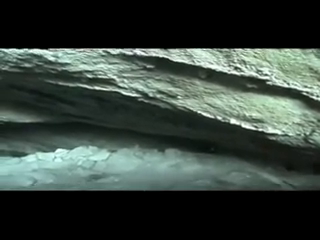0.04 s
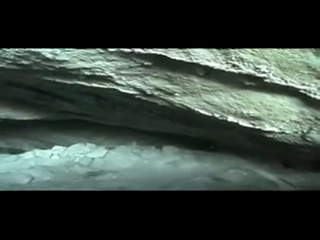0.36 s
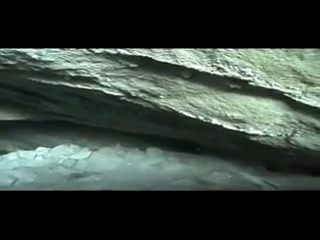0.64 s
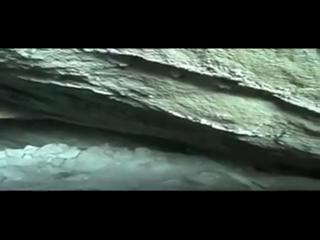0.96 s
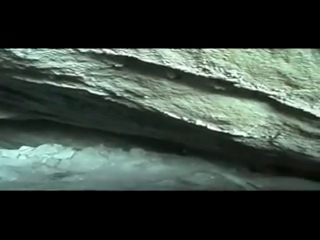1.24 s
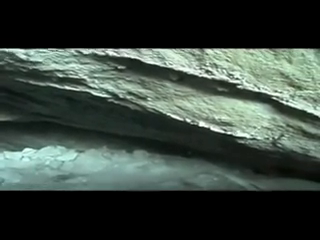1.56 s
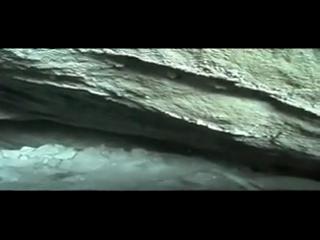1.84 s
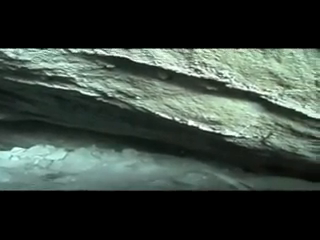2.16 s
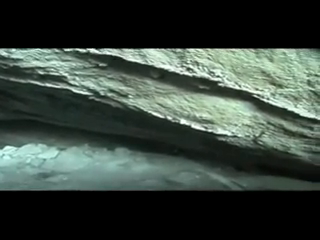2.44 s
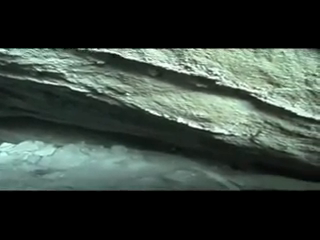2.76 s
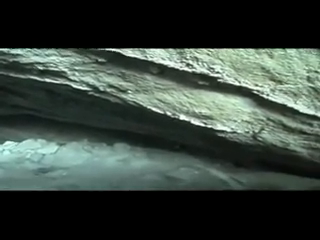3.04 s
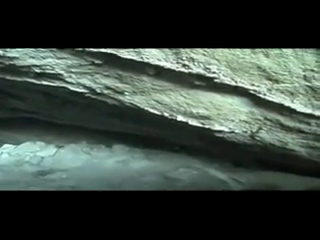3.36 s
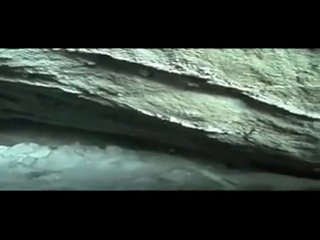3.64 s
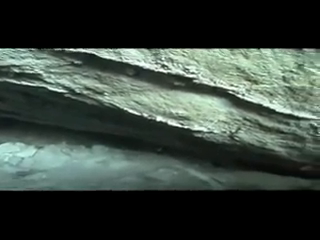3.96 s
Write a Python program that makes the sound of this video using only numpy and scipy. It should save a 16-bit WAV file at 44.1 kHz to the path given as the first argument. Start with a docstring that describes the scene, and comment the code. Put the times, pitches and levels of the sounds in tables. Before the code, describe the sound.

A few echoing water drops plop and tick beneath a rock overhang, above a deep rumble.

```python
"""Water drips into a pool under a rock overhang. Each drop slaps the surface, traps a bubble that
plops, and throws fine spray; other drops only tick on wet stone. The rock echoes after each one.
Underneath, a dull rumble rings the hollow's low resonances and gains bass toward the end,
while a deep drone slowly swells and sinks."""
import sys
import numpy as np
from scipy import signal
from scipy.fft import rfft, irfft
from scipy.io import wavfile

SR = 44100
rng = np.random.default_rng(int(sys.argv[2]) if len(sys.argv) > 2 else 0)


def bounce(signal):
    """Save signal as a 16-bit WAV file at the path given by the first command-line argument."""
    frames = np.transpose(np.atleast_2d(signal))
    limited = np.clip(frames, -1, 1)
    pcm = np.round(limited * 32767).astype(np.int16)
    wavfile.write(sys.argv[1], SR, pcm)


N = 176400

# rumble spectrum (frequency [Hz], relative density [dB])
RUMBLE_SPECTRUM = [(30, -15.5), (60, -7.5), (75, 2.5), (107, -11), (145, 1), (183, -6.5), (260, -6.5),
                   (319, -10.5), (423, -16), (519, -19), (800, -28), (1150, -34), (1500, -41.5),
                   (1900, -48), (2400, -70.5), (4000, -87), (10000, -104)]
# rumble width (frequency [Hz], side minus mid [dB])
RUMBLE_WIDTH = [(60, -5), (150, -3.5), (500, -3.5), (1000, -2.5), (2000, -2.5)]
# resonances of the hollow (frequency [Hz], width [Hz], level [dB])
HOLLOW_MODES = [(148.75, 23, -33.5), (213.9, 19, -36), (241.45, 10, -41), (317.3, 6.7, -40.5),
                (364.6, 1.6, -43), (400, 1.2, -48), (459.1, 19, -49), (517.7, 4.6, -48.5), (650, 31, -55.5),
                (818.4, 10, -56.5)]
# growing bass band (time [s], level [dB])
BASS_LEVELS = [(0, -43.5), (1.6, -47.5), (2.5, -37), (3.0, -36.5), (4.0, -25.5)]
# drone envelope (time [s], left gain [dB], right gain [dB])
DRONE_GAINS = [(0, -12.0, -13.0), (0.3, -15.0, -15.0), (0.58, -28.0, -15.0), (0.72, -25.0, -14.0),
               (0.95, -16.0, -12.0), (1.25, -13.0, -13.0), (1.55, -17.0, -22.0), (1.75, -16.0, -15.0),
               (2.05, -19.0, -12.0), (2.35, -19.0, -11.0), (2.6, -16.0, -10.0), (2.9, -20.0, -13.0),
               (3.15, -22.0, -16.0), (3.45, -21.0, -13.0), (3.7, -19.0, -10.0), (4.0, -22.0, -10.0)]
# drops and after-splashes on stone (time [s], rise [ms], level of rings 1-6 [dB])
STONE_HITS = [(0.6020, 2.6, -56, -65, -66, -55, -53, -64), (0.6120, 20.0, -69, -77, -79, -77, -76, -81),
              (2.6494, 1.7, -54, -66, -65, -60, -63, -69), (2.7142, 1.5, -68, -71, -65, -50, -48, -62),
              (3.5936, 1.3, -36, -39, -39, -32.5, -46, -42.5)]
# rings of a tick (frequency [Hz], width [Hz])
STONE_RINGS = [(2400, 2700), (5400, 450), (6150, 420), (7400, 1500), (8450, 1400), (9800, 840)]
# echo tail decay (frequency [Hz], T60 [s])
TAIL_T60 = [(500, 1.3), (1300, 1.1), (2800, 0.99), (7500, 0.74), (10000, 0.39)]
# echo tail spectrum (frequency [Hz], level re direct [dB])
TAIL_SPECTRUM = [(500, -12), (1300, -12.5), (2000, -9.5), (2450, -7.5), (2950, -9), (3400, -8), (4200, -4),
                 (7500, -6), (10000, -6.5)]
# returns from far faces (delay [s], gain [dB])
FAR_RETURNS = [(.060, -21), (.101, -16), (.178, -19), (.243, -24)]
# drops into the pool (time [s], bubble pitch [Hz], bubble level [dB], rise [ms], slap gain [dB])
POOL_DROPS = [(0.8292, 1264, -20.5, 5.6, -2), (2.8700, 1230, -26.5, 5.4, -1.5),
              (3.6652, 2905, -22.5, 2.5, 6), (3.8217, 1385, -25.5, 3.2, 1)]
# small bubbles shed by splashes (time [s], pitch [Hz], level [dB], rise [ms])
SPLASH_BUBBLES = [(0.8595, 3430, -56, 1.8), (3.6657, 2430, -27.5, 1.2), (3.6735, 3560, -47, 2.0),
                  (3.8295, 9500, -56, 1.0)]
# slap colour (frequency [Hz], gain [dB])
SLAP_COLOUR = [(500, -24.5), (1100, -11), (1750, 0.5), (2050, -0.5), (2400, 1), (2900, -17.5),
               (3600, -11.5), (4200, -24), (4800, -27), (5350, -17.5), (6500, -26.5), (7600, -21),
               (8400, -31), (10000, -32.5)]
# spray colour (frequency [Hz], gain [dB])
SPRAY_COLOUR = [(1000, -11.5), (2400, 0), (3500, -1.5), (5000, -4.5), (10000, -5.5)]

RUMBLE_HALFWAY_DB, RUMBLE_RISE_DB_PER_S = -25.5, 0.48
BASS_HZ, BASS_WIDTH_HZ, BASS_PAN_DB = 79.6, 74, -6
DRONE_HZ, DRONE_BASE_DB, DRONE_WANDER, DRONE_SPREAD_RAD = 51.73, 1, 0.0046, 0.57
BEAT_HZ, BEAT_DB, BEAT_WANDER = 61.65, -30, 0.024
TAIL_BUILD_S, ECHO_SIDE_DB, DRIP_PAN_DB = 0.0028, -13.5, -1.95
NEAR_ROCK_DB, NEAR_ROCK_RISE_MS, FAR_ROCK_CUTOFF_HZ = -10.5, 6.3, 2100
SPRAY_BASE_DB, SPRAY_DECAY_S, DROPLETS_PER_S = -52, 0.028, 900
BUBBLE_GLIDE = 0.011  # fraction of pitch per rise time
LOWPASS_HZ = 10300


def undb(db):
    """Decibels to gain."""
    return 10 ** (np.asarray(db) / 20)


def unit(x):
    """Scale to rms 1."""
    return x / np.sqrt(np.mean(x ** 2))


def along(points, hz):
    """Interpolate (Hz, value) points over log frequency."""
    p = np.array(points, float)
    return np.interp(np.log(np.maximum(hz, 1)), np.log(p[:, 0]), p[:, 1])


def bins_hz():
    """Frequencies of a full-length spectrum."""
    return np.arange(N // 2 + 1) * SR / N


def noise(gain):
    """Noise of rms 1, shaped by a gain per bin."""
    return unit(irfft(rfft(rng.standard_normal(N)) * gain, N))


def colour(x, points):
    """Minimum-phase filter from (Hz, dB) points."""
    cepstrum = irfft(np.log(undb(along(points, bins_hz()))), N)
    cepstrum[1:N // 2] *= 2
    cepstrum[N // 2 + 1:] = 0
    return irfft(rfft(x) * np.exp(rfft(cepstrum)), N)


def resonance(hz, width_hz):
    """Band-pass response: one resonance applied twice."""
    f = np.maximum(bins_hz(), 1)
    return 1 / (1 + 1j * (f ** 2 - hz ** 2) / (f * width_hz)) ** 2


def drift(rate_hz):
    """Slow random drift, rms 1."""
    return noise(np.exp(-(bins_hz() / rate_hz) ** 2) * (bins_hz() > 0))


def since(start_s):
    """Seconds since the start, zero before it."""
    return np.maximum(np.arange(N) / SR - start_s, 0)


def swell(age_s, rise_ms):
    """Envelope that peaks at 1 after rise_ms, then dies."""
    u = np.minimum(age_s * 1000 / rise_ms, 20)
    return np.sqrt(u * np.exp((1 - u ** 2) / 2))


def pan(x, db):
    """Pan by left minus right level."""
    return x * undb(np.array([db, -db]).reshape(2, -1) / 2)


def stereo(mid, side):
    """Mid and side to left and right."""
    return np.array([mid + side, mid - side])


def rumble():
    """Wide, dull outdoor noise, the hollow's ringing resonances and a growing bass band."""
    t = since(0)
    mid_gain = undb(along(RUMBLE_SPECTRUM, bins_hz()))
    side_gain = mid_gain * undb(along(RUMBLE_WIDTH, bins_hz()))
    side_rms = np.sqrt(np.sum(side_gain ** 2) / np.sum(mid_gain ** 2))
    level_db = RUMBLE_HALFWAY_DB + RUMBLE_RISE_DB_PER_S * (t - N / SR / 2)
    out = undb(level_db) * stereo(noise(mid_gain), side_rms * noise(side_gain))
    for hz, width_hz, db in HOLLOW_MODES:
        ring = resonance(hz, width_hz)
        out += undb(db) * stereo(noise(ring), undb(along(RUMBLE_WIDTH, hz)) * noise(ring))
    bass_db = np.interp(t, *np.array(BASS_LEVELS).T)
    bass = undb(bass_db) * noise(resonance(BASS_HZ, BASS_WIDTH_HZ))
    return out + pan(bass, BASS_PAN_DB)


def drone():
    """A deep tone swells and sinks on each side, beating with a weaker one above it."""
    times_s, *sides_db = np.array(DRONE_GAINS).T
    gain_db = np.array([np.interp(since(0), times_s, side_db) for side_db in sides_db])
    phase = 2 * np.pi * np.cumsum(DRONE_HZ * (1 + DRONE_WANDER * drift(0.79))) / SR
    tone = np.sin(stereo(phase, DRONE_SPREAD_RAD * drift(0.41)))
    beat_phase = 2 * np.pi * np.cumsum(BEAT_HZ * (1 + BEAT_WANDER * drift(0.72))) / SR
    return np.sqrt(2) * (undb(DRONE_BASE_DB + gain_db) * tone + undb(BEAT_DB) * np.sin(beat_phase))


def stone_ticks():
    """Drops burst on stone: a short spatter excites six rings."""
    spectrum = 0
    for k, (hz, width_hz) in enumerate(STONE_RINGS):
        ring = resonance(hz, width_hz)
        ring_rms = np.sqrt(np.mean(abs(ring) ** 2))
        envelope = sum(undb(rings_db[k]) * swell(since(start_s), rise_ms)
                       for start_s, rise_ms, *rings_db in STONE_HITS)
        spectrum += rfft(envelope * rng.standard_normal(N)) * ring / ring_rms
    return irfft(spectrum, N)


def rock_response():
    """Impulse response: near-face scatter, a dense tail whose treble dies first, far-face returns."""
    t, f, out = since(0), bins_hz(), np.zeros(N)
    near = undb(NEAR_ROCK_DB) * unit(swell(t, NEAR_ROCK_RISE_MS))
    edges_hz = np.geomspace(400, 12000, 21)
    for low_hz, high_hz in zip(edges_hz, edges_hz[1:]):
        hz = np.sqrt(low_hz * high_hz)
        decay = undb(-60 * t / along(TAIL_T60, hz))
        build = 1 - np.exp(-t / TAIL_BUILD_S)
        tail = undb(along(TAIL_SPECTRUM, hz)) * unit(decay * build)
        band = noise((f >= low_hz) & (f < high_hz))
        band_scale = np.sqrt(2 * (high_hz - low_hz) / SR / N)  # unity gain in band
        out += np.hypot(tail, near) * band * band_scale
    dull_pulse = irfft(1 / (1 + 1j * f / FAR_ROCK_CUTOFF_HZ) ** 2, N)  # rough stone scatters treble away
    for delay_s, db in FAR_RETURNS:
        out += undb(db) * np.roll(dull_pulse, int(delay_s * SR))
    return out


def bubble(start_s, hz, db, rise_ms):
    """A trapped bubble rings; its pitch climbs as it nears the surface."""
    age_s = since(start_s)
    glide = BUBBLE_GLIDE * age_s * 1000 / rise_ms
    return undb(db) * swell(age_s, rise_ms) * np.sin(2 * np.pi * hz * age_s * (1 + glide / 2))


def pool_plops():
    """Each drop slaps the pool, rings a bubble and throws droplets that patter back."""
    bubbles = sum(bubble(*row) for row in SPLASH_BUBBLES)
    slaps, spray = np.zeros(N), np.zeros(N)
    droplets = unit(rng.standard_normal(N) * (rng.random(N) < DROPLETS_PER_S / SR))
    for start_s, hz, db, rise_ms, slap_db in POOL_DROPS:
        age_s = since(start_s)
        bubbles += bubble(start_s, hz, db, rise_ms)
        slaps[int(start_s * SR)] += undb(slap_db)
        spray += undb(SPRAY_BASE_DB) * droplets * np.exp(-age_s / SPRAY_DECAY_S) * (age_s > 0)
    return bubbles + colour(slaps, SLAP_COLOUR) + colour(spray, SPRAY_COLOUR)


def scene():
    """Drips and their echo, slightly right, over rumble and drone."""
    drips = pool_plops() + stone_ticks()
    echo_mid, echo_side = (signal.fftconvolve(drips, rock_response())[:N] for _ in range(2))
    echoing_drips = stereo(drips + echo_mid, undb(ECHO_SIDE_DB) * echo_side)
    return pan(echoing_drips, DRIP_PAN_DB) + rumble() + drone()


def record(dry):
    """Steep elliptic low-pass."""
    return signal.sosfilt(signal.ellip(8, .2, 70, LOWPASS_HZ, fs=SR, output="sos"), dry)


dry = scene()
out = record(dry)
bounce(out)
```